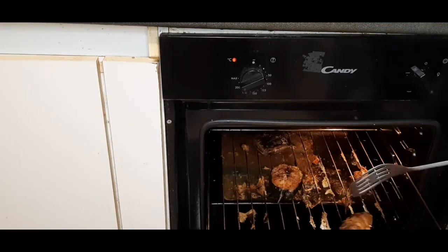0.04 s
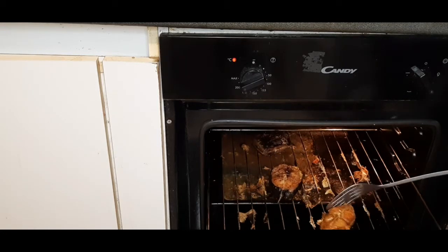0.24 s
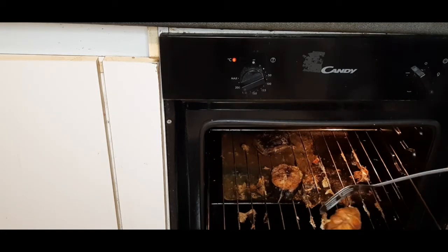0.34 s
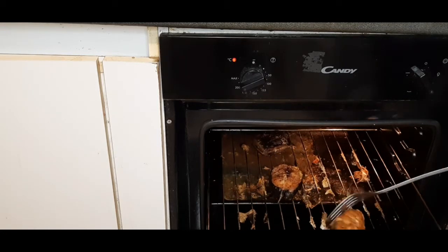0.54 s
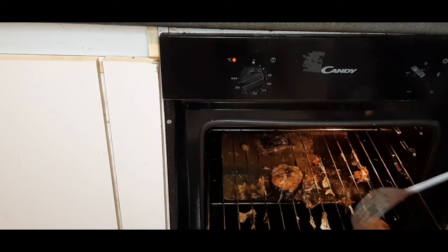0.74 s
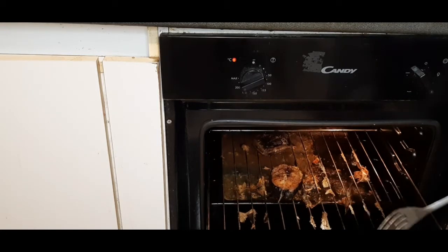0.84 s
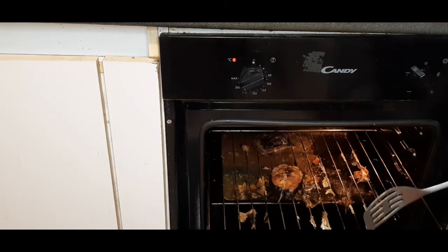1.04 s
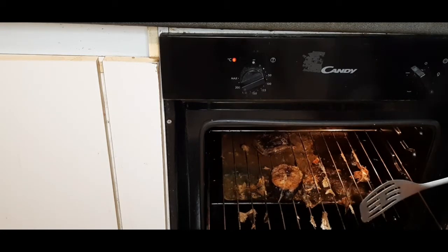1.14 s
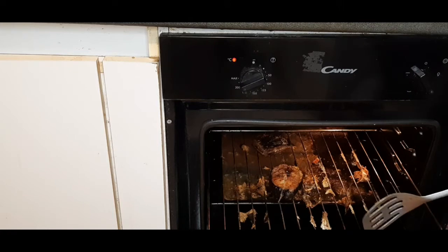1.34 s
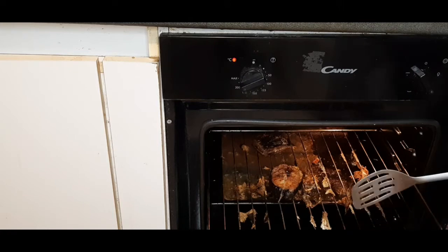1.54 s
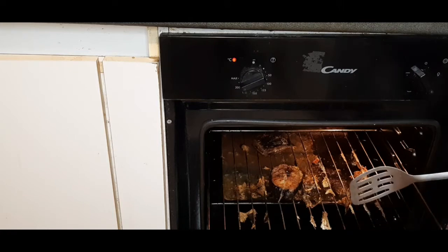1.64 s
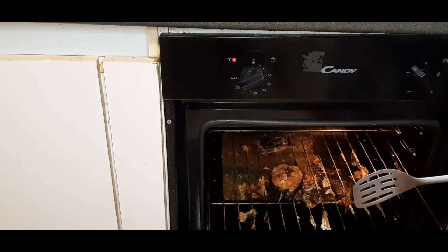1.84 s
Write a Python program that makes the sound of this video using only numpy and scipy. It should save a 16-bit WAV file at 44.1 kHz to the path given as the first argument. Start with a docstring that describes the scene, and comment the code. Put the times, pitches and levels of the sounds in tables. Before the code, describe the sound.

Close up at an open oven, metal utensils knock and scrape a loaded wire rack in two uneven bursts, with short boxy ringing and crisp ticks, before the clatter fades into faint hum and hiss.

```python
"""The wire rack of an open oven jolts and clatters as a fork and a slotted steel spatula turn fish on it.
Each blow is a decaying burst of coloured noise plus one loaded-wire note; struck steel rings as sums of modes.
Fork and blade scrape as a random train of slips with an echo, and the utensils' tips give sharp bright ticks.
Under it all the hot oven hums and hisses as steady coloured noise, with a low rumble and ring that swell and sink."""
import sys
import numpy as np
from scipy import signal
from scipy.fft import rfft, irfft, next_fast_len
from scipy.io import wavfile
from scipy.ndimage import map_coordinates

SR = 44100
rng = np.random.default_rng(int(sys.argv[2]) if len(sys.argv) > 2 else 0)


def pcm_store(signal):
    """Save signal as 16-bit PCM."""
    levels = np.round(np.clip(np.atleast_2d(signal), -1, 1) * 32767)
    wavfile.write(sys.argv[1], SR, levels.astype(np.int16).T)


N = 83790
EVENT_SAMPLES = 32768  # length given to each struck sound
ATTACK_S = 0.0019  # time constant of the rise of blows, rings and tick echoes
CLATTER_REF_HZ = 1034  # centre of the clatter spectrum as tabled
RACK_WAVER_RAD = 0.4  # phase unrest of the ringing rack


def amp(db):
    """Decibels to gain."""
    return 10 ** (np.asarray(db) / 20)


def unit(x):
    """Scale to rms 1."""
    return x / np.sqrt(np.mean(x ** 2) + 1e-20)


def along(points, hz):
    """Read a curve of (frequency, value) points on a log frequency axis."""
    f, v = np.transpose(points)
    return np.interp(np.log(hz + 1), np.log(f + 1), v)


def level(points):
    """Gain per sample from (time_s, level_db) points."""
    return amp(np.interp(np.arange(N) / SR, *np.transpose(points)))


def wander(position):
    """A smooth random curve through one normal draw per whole step of position."""
    return map_coordinates(rng.standard_normal(2048), [position])


def decay(t, t60):
    """Exponential fall by 60 dB in t60 seconds."""
    return np.exp(-np.log(1000) * t / t60)


def attack(t):
    """Rounded onset of a struck sound."""
    return 1 - np.exp(-t / ATTACK_S)


def add(track, start_s, sound):
    """Lay a sound into a track at a time, cut off at the track's end."""
    part = track[:, max(round(start_s * SR), 0):][:, :sound.shape[-1]]
    part += sound[..., :part.shape[1]]


def filtered(x, gain):
    """Apply a gain over frequency to x."""
    size = next_fast_len(x.shape[-1] + SR // 10)
    hz = np.fft.rfftfreq(size, 1 / SR)
    return irfft(rfft(x, size) * gain(hz), size)[..., :x.shape[-1]]


# how alike left and right are: pitch_hz, likeness (correlation, -1 to 1)
STEREO_LIKENESS = [(60, 0.92), (250, 0.9), (500, 0.81), (1000, 0.3), (2000, 0.19), (4000, -0.024),
                   (15000, -0.14)]


def stereo_angle(hz):
    """Angle in radians that splits mid and side to give the tabled likeness."""
    return np.arccos(np.clip(along(STEREO_LIKENESS, hz), -1, 1)) / 2


def noise(gain, size):
    """Coloured stereo noise of rms 1, alike in the bass and unrelated in the treble."""
    hz = np.fft.rfftfreq(size, 1 / SR)
    angle = stereo_angle(hz)
    spectra = rfft(rng.standard_normal((2, size))) * gain(hz)
    mid, side = irfft(spectra * [np.cos(angle), np.sin(angle)], size)
    return unit(np.array([mid + side, mid - side]))


# resonances of rack and cavity: pitch_hz, width_hz, lift_db
RESONANCES = [(145.5, 6.2, 4), (227.5, 17, 4), (250, 37, 4.5), (303, 24.5, 8), (397.6, 18, 11),
              (477, 25, 11.5), (583.6, 23, 10.5), (734, 43, 8.5), (894, 83, 9), (1114, 12, 2),
              (1517, 53, 7), (1650, 10, 4.5), (1890, 130, 1.5), (3122, 59, 6.5)]


def in_oven(spectrum):
    """Lift a dB spectrum at the resonances of rack and cavity; gives a gain over frequency."""
    def gain(hz):
        lift = sum(db / (1 + (2 * (hz - f) / width) ** 2) for f, width, db in RESONANCES)
        return amp(along(spectrum, hz) + lift)
    return gain


# how long the cavity rings: pitch_hz, t60_s
CAVITY_DECAY = [(70, 0.15), (200, 0.53), (500, 0.25), (1500, 0.29), (4000, 0.32), (8000, 0.25),
                (15000, 0.23)]


def dying(x):
    """Let each frequency die at the cavity's rate after a short hold."""
    hold_s = 0.0032
    hz, t, z = signal.stft(x, SR, nperseg=256)
    t60 = along(CAVITY_DECAY, hz)[:, None]
    fade = amp(-60 * np.maximum(t - hold_s, 0) / t60)
    return signal.istft(z * fade, SR)[1][:, :x.shape[1]]


# steady hum and hiss of the hot oven: pitch_hz, density_db (dB per Hz)
OVEN_SPECTRUM = [(25, -22), (70, 0), (165, -8.5), (205, -12), (255, -4.5), (370, -0.5), (480, -9.5),
                 (700, -9), (1100, -6.5), (1550, -1), (1900, -12), (2700, -15), (3150, -3), (3700, -12),
                 (4500, -12.5), (5500, -5), (6800, -17), (8000, -12.5), (9500, -20), (12000, -12),
                 (16000, -17)]
# low rumble of the shaken oven: pitch_hz, density_db (dB per Hz)
RUMBLE_SPECTRUM = [(25, -57), (45, -28.5), (70, -5), (90, -11.5), (130, -17.5), (250, -44)]
# how strongly the oven is shaken: time_s, level_db
RUMBLE_LEVEL = [(.18, -82), (.27, -47), (.35, -57.5), (.45, -52), (.55, -52.5), (.64, -55.5), (.77, -59.5),
                (.88, -59), (1, -55), (1.09, -45), (1.2, -50), (1.38, -57.5), (1.5, -59), (1.59, -42),
                (1.65, -62.5), (1.8, -95)]
# lingering low ring of the rack: pitch_hz, density_db (dB per Hz)
LINGER_SPECTRUM = [(70, -17), (165, 7.5), (205, -7), (255, 4.5), (340, -11), (480, -7), (700, -12.5),
                   (1200, -26)]
# rise and fall of that ring: time_s, level_db
LINGER_LEVEL = [(0, -53.5), (.15, -57.5), (.5, -47), (.68, -48), (.79, -52.5), (1, -54), (1.9, -64)]


def oven():
    """Steady hum and hiss, the rumble of the shaken casing and the rack's lingering ring, all as noise."""
    hum = amp(-56) * noise(lambda hz: amp(along(OVEN_SPECTRUM, hz)), N)
    rumble = level(RUMBLE_LEVEL) * noise(in_oven(RUMBLE_SPECTRUM), N)
    linger = level(LINGER_LEVEL) * noise(in_oven(LINGER_SPECTRUM), N)
    return hum + rumble + linger


# blows on the rack: start_s, thud_db, clatter_db, edge_db,
# wire_hz (pitch of the loaded wire), centre_hz (centre of the clatter)
RACK_BLOWS = [(.231, -38.5, -43.5, -58, 209, 706), (.239, -36, -42, -61, 210, 730),
              (.252, -37, -47, -58, 171.4, 600), (.293, -39, -39.5, -62, 212, 850),
              (.364, -34, -44, -44, 161, 990), (.383, -43, -51, -58, 408, 1000),
              (.404, -38, -45.5, -60, 214.6, 930), (.468, -32.5, -35, -57, 207, 925),
              (.491, -38, -39, -60, 202, 950), (.555, -37, -32, -42, 167, 950),
              (.579, -40.5, -42, -44, 214, 990), (.634, -49, -47.5, -64, 263, 600),
              (0.824, -39, -56, -53, 248, 960), (.859, -32.5, -32.5, -45.5, 154.9, 1045),
              (.868, -45.5, -36.5, -64, 163, 790), (.93, -40.5, -30.5, -33, 253, 1140),
              (0.953, -60, -53, -34, 295, 1200), (1.025, -39.5, -30.5, -33.5, 398, 1030),
              (1.107, -52, -42, -42.5, 302, 1020), (1.156, -68, -54, -42, 293, 1800),
              (1.17, -44, -37.5, -58, 215.3, 1170), (1.25, -41, -38.5, -38, 342, 1140),
              (1.322, -46.5, -39, -44, 306.5, 1040), (1.382, -45, -43.5, -46, 304, 1230),
              (1.451, -43, -40, -56, 241.5, 1450), (1.552, -48.5, -47, -68, 330, 1270),
              (1.565, -43.5, -47.5, -75, 231, 440)]
# dull thud of a blow: pitch_hz, density_db (dB per Hz)
THUD_SPECTRUM = [(40, -51), (100, -10.5), (155, -3.5), (215, 1.5), (300, -11.5), (480, -7.5), (700, -12),
                 (1200, -60)]
# clatter of a blow, moved to each blow's centre: pitch_hz, density_db (dB per Hz)
CLATTER_SPECTRUM = [(200, -12), (450, 0), (700, -1.5), (900, 4.5), (1200, 6), (1600, 5.5), (2300, 1),
                    (3200, -10), (4500, -19), (9000, -40)]
# bright edge of a blow: pitch_hz, density_db (dB per Hz)
EDGE_SPECTRUM = [(1200, -26), (2500, 1), (3800, -1), (5500, -6), (7500, -6.5), (9000, -21.5), (12000, -14),
                 (16000, -25)]


def rack():
    """Each blow twangs the loaded wire and sets the crowded modes of rack and walls going."""
    thud_trim_db, wire_trim_db, wire_t60_s = -3, -2, 0.33  # both trims are relative to the blow's thud_db
    out, t = np.zeros((2, N)), np.arange(EVENT_SAMPLES) / SR
    for start_s, thud_db, clatter_db, edge_db, wire_hz, centre_hz in RACK_BLOWS:
        moved = [(f * centre_hz / CLATTER_REF_HZ, db) for f, db in CLATTER_SPECTRUM]
        thud = amp(thud_db + thud_trim_db) * noise(in_oven(THUD_SPECTRUM), EVENT_SAMPLES)
        clatter = amp(clatter_db) * noise(in_oven(moved), EVENT_SAMPLES)
        edge = amp(edge_db) * noise(in_oven(EDGE_SPECTRUM), EVENT_SAMPLES)
        twang = amp(thud_db + wire_trim_db) * np.sin(2 * np.pi * wire_hz * t) * decay(t, wire_t60_s)
        add(out, start_s, attack(t) * (dying(thud + clatter + edge) + twang))
    return out


def ring(hits, modes, waver_rad):
    """Struck steel rings in its own modes; phase and strength flutter while it stays in contact."""
    flutter_db, waver_per_s = 3, 106.8  # contact damps a ring unevenly
    out, t = np.zeros((2, N)), np.arange(EVENT_SAMPLES) / SR
    for start_s, hit_db in hits:
        for hz, mode_db, t60 in modes:
            spread = stereo_angle(hz) * rng.choice([-1, 1])
            phase = rng.uniform(0, 2 * np.pi) + waver_rad * wander(t * waver_per_s)
            phase = phase + np.array([[spread], [-spread]])
            flutter = flutter_db * wander(t * waver_per_s)
            # the last term offsets the mean power gained by fluttering in decibels
            strength = amp(hit_db + mode_db + flutter - flutter_db ** 2 * np.log(10) / 20)
            fade = strength * decay(t, t60) * attack(t)
            add(out, start_s, fade * np.sin(2 * np.pi * hz * t + phase))
    return out


# the fork catches a wire: start_s, level_db
FORK_CATCHES = [(.364, -39), (.394, -43.5), (.424, -50)]
# the fork's modes: pitch_hz, level_db, t60_s
FORK_MODES = [(2070, 3.5, 0.17), (2070, -6, 0.12), (2004, 2, 0.12), (3170, -6, 0.15), (3360, -6.5, 0.21),
              (3930, -8.5, .11), (5260, -7, 0.071), (5540, -9, 0.09), (5990, -11, 0.073)]


def fork():
    """The fork's high modes ring briefly as it catches a wire, with strong phase unrest."""
    return ring(FORK_CATCHES, FORK_MODES, waver_rad=0.71)


# fork, then blade, slides over the wires: time_s, level_db
SLIDE_LEVEL = [(.45, -83), (.5, -56), (.55, -41), (.62, -55), (.76, -63.5), (.81, -51), (.92, -83),
               (.97, -42.5), (1.06, -47.5), (1.13, -40), (1.2, -45.5), (1.3, -52.5), (1.4, -75),
               (1.535, -45.5), (1.62, -63), (1.68, -67.5)]
# colour of the scrape: pitch_hz, density_db (dB per Hz)
SCRAPE_SPECTRUM = [(120, -32), (350, -7), (1000, -11.5), (2200, -6), (4000, -12.5), (6000, -13),
                   (9000, -19), (12500, -13), (16000, -13.5)]


def scrape():
    """Steel sticks and slips at random with an unsteady grip; every slip echoes in the cavity."""
    slips_per_s, scatter_db, echo_db = 450, 10.5, 7  # echo_db is over the direct sound
    grip_db, grips_per_s = 1, 93  # depth and rate of the steel's catches
    strength = amp(scatter_db * np.tanh(rng.standard_normal(N)))
    slips = (rng.random(N) < slips_per_s / SR) * strength * rng.choice([-1, 1], N)
    answer = dying(noise(np.ones_like, EVENT_SAMPLES))
    answer = answer / np.linalg.norm(answer[0])
    echo = signal.fftconvolve(slips[None], answer, axes=1)[:, :N]
    grip = amp(grip_db * wander(np.arange(N) * grips_per_s / SR))
    rasp = filtered(slips + amp(echo_db) * echo, in_oven(SCRAPE_SPECTRUM))
    return level(SLIDE_LEVEL) * unit(grip * rasp)


# ticks of the tips (the faint one at 0.949 s is only an echo, not a tip of its own): start_s, snap_db, echo_db,
# centre_hz, skirt_db (broad skirt around the centre)
TIP_TICKS = [(0.513, -38, -44, 11660, -20), (0.5247, -25, -44, 11400, -26), (0.526, -22, -38, 11100, -23),
             (.549, -32, -53, 11600, -12), (0.582, -27, -45.5, 11000, -3), (0.949, -44, -42, 12800, -1),
             (1.0197, -24.5, -40, 14200, -1), (1.026, -30, -51, 13200, -11), (1.1072, -42, -44, 12200, -7),
             (1.23, -30, -41, 12900, -8), (1.2469, -27, -43.5, 12000, -1), (1.3602, -25.5, -48, 12700, -14),
             (1.3719, -19, -40.5, 12900, -7), (1.5094, -37, -45.5, 6700, -9),
             (1.5116, -27, -39, 13900, -12)]


def ticks():
    """A tip snaps off a wire in under a millisecond; the cavity answers with a short hiss."""
    snap_s, echo_t60_s = 0.00041, 0.24  # time constant of the snap, decay of its echo
    band_oct, skirt_oct = 0.18, 0.65  # widths (standard deviations) in octaves
    out, t = np.zeros((2, N)), np.arange(EVENT_SAMPLES) / SR
    echo = decay(t, echo_t60_s) * attack(t)
    fall = np.exp(-t / snap_s)
    for start_s, snap_db, echo_db, centre_hz, skirt_db in TIP_TICKS:
        def colour(hz):
            octaves = np.log2((hz + 1) / centre_hz)
            band = np.exp(-.5 * (octaves / band_oct) ** 2)
            skirt = np.exp(-.5 * (octaves / skirt_oct) ** 2)
            return band + amp(skirt_db) * skirt
        hiss = noise(colour, EVENT_SAMPLES)
        snap = fall * hiss
        # give each channel's snap the energy of the bare envelope
        snap = snap * np.linalg.norm(fall) / np.linalg.norm(snap, axis=1, keepdims=True)
        add(out, start_s, amp(snap_db) * snap + amp(echo_db) * echo * hiss)
    return out


# a bare wire of the rack is knocked: start_s, level_db
WIRE_KNOCKS = [(.555, -38.5)]
# the bare wire's modes: pitch_hz, level_db, t60_s
WIRE_MODES = [(1476, -2, 0.34), (1587, 2, 0.3), (3140, 0, 0.19)]


def bare_wire():
    """A bare wire of the rack is knocked and rings on in its own modes."""
    return ring(WIRE_KNOCKS, WIRE_MODES, RACK_WAVER_RAD)


# the spatula strikes a wire: start_s, level_db
SPATULA_STRIKES = [(.931, -40), (1.026, -43.5), (1.171, -51), (1.204, -52), (1.251, -41), (1.322, -48.5),
                   (1.384, -50)]
# the spatula's modes: pitch_hz, level_db, t60_s
SPATULA_MODES = [(381, 0.5, 0.48), (755, -9.5, 0.66), (928, 4, 0.56), (1110, 0, 0.45), (1225, -5.5, 0.67),
                 (1406, 0, 0.23), (1960, -8, 0.17), (2330, 2, 0.29), (2818, -6.5, 0.46), (3060, -11, 0.66),
                 (3670, -11, 0.28)]


def spatula():
    """The slotted spatula strikes wires and rings in its own modes."""
    return ring(SPATULA_STRIKES, SPATULA_MODES, waver_rad=0.36)


# the rack's frame drops back on its runners: start_s, level_db
FRAME_DROPS = [(1.566, -44)]
# the frame's modes: pitch_hz, level_db, t60_s
FRAME_MODES = [(406, -7, 0.19), (483, -5.5, .15), (589, 5, 0.2), (688, -5, 0.15)]


def frame():
    """The rack's frame drops back on its runners and rings in its low modes."""
    return ring(FRAME_DROPS, FRAME_MODES, RACK_WAVER_RAD)


def crowded(x):
    """Countless narrow modes of wires and walls favour some frequencies, differently in each channel."""
    unevenness_db, spacing_hz = 3, 22.14  # the unevenness is reached only towards the treble

    def gain(hz):
        ripple = np.array([wander(hz / spacing_hz) for _ in range(2)])
        depth_db = unevenness_db * hz ** 2 / (hz ** 2 + CLATTER_REF_HZ ** 2)
        # the last term offsets the mean power gained by rippling in decibels
        return amp(depth_db * ripple - depth_db ** 2 * np.log(10) / 20)
    return filtered(x, gain)


def scene():
    """Everything sounds from the open oven."""
    steel = fork() + bare_wire() + spatula() + frame()
    return oven() + crowded(rack() + scrape()) + steel + ticks()


# balance of the channels: pitch_hz, left_over_right_db
CHANNEL_LEAN = [(100, -0.4), (700, -0.3), (1300, -1), (2400, 0.2), (4400, 1.5), (6200, 13), (8200, 33),
                (11000, 15.5), (15000, 6.5)]


def record(dry):
    """The right channel is shaded in the treble; nothing is kept above the band limit."""
    top_hz = 16000

    def channel_gains(hz):
        ratio = amp(along(CHANNEL_LEAN, hz))
        shared = np.sqrt(2 / (1 + ratio ** 2))  # keeps the summed power of the two gains
        return np.array([ratio, np.ones_like(hz)]) * shared * (hz < top_hz)
    return filtered(dry, channel_gains)


dry = scene()
out = record(dry)
pcm_store(out)
```